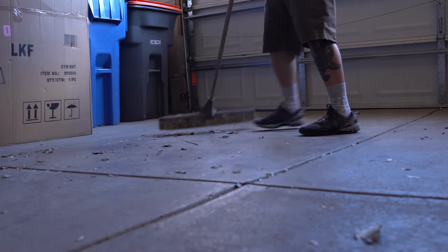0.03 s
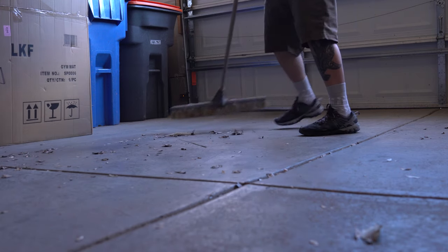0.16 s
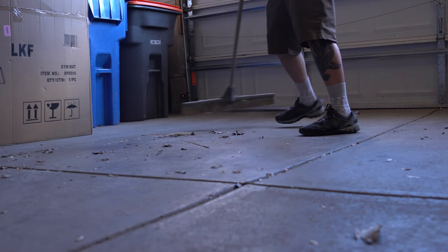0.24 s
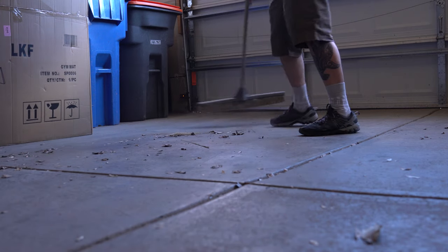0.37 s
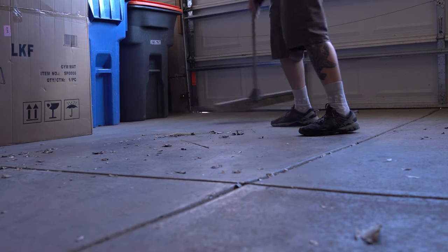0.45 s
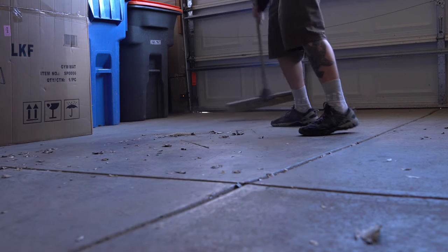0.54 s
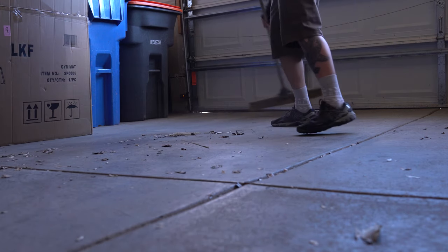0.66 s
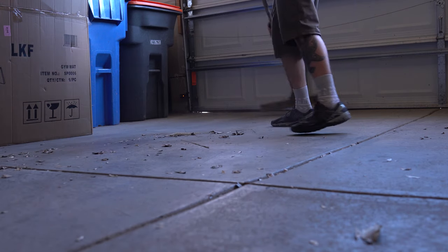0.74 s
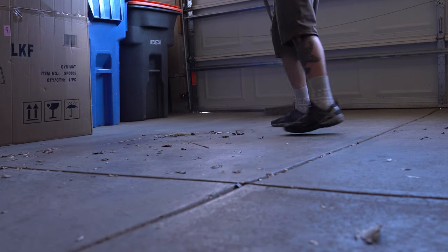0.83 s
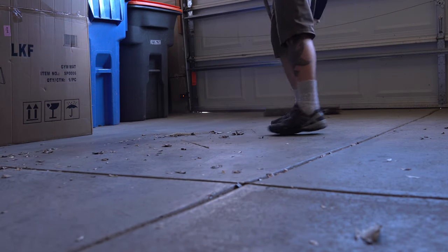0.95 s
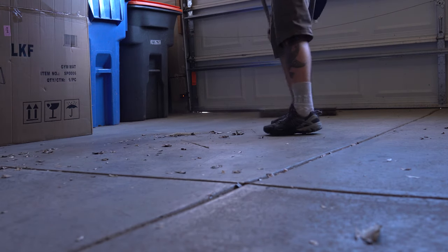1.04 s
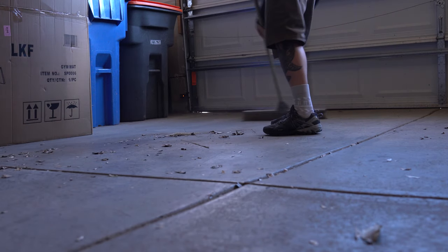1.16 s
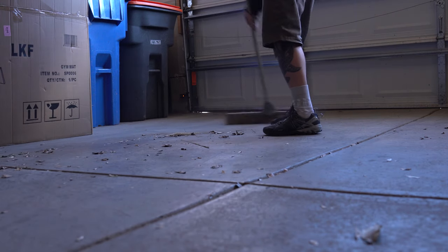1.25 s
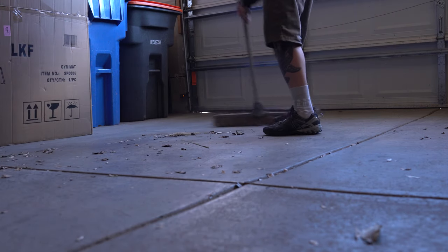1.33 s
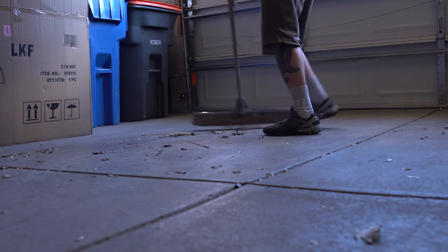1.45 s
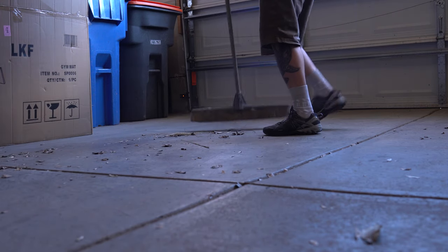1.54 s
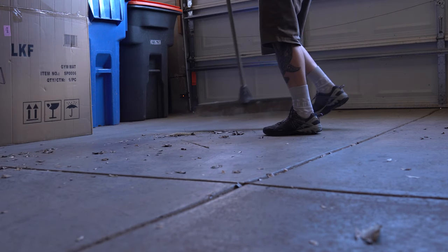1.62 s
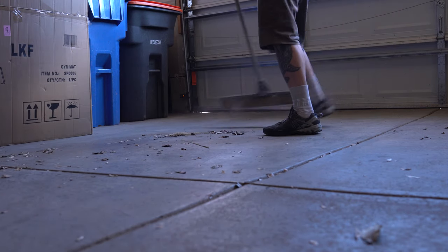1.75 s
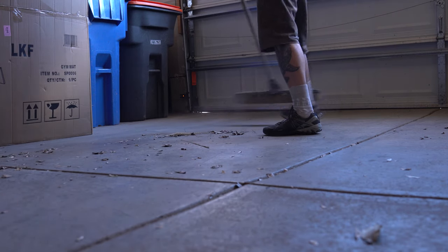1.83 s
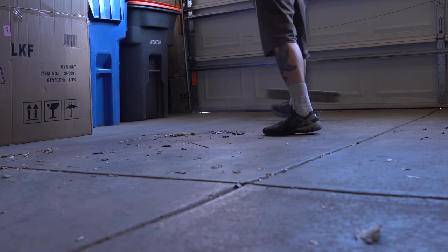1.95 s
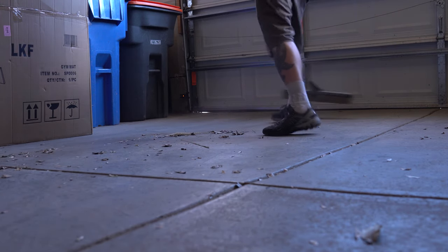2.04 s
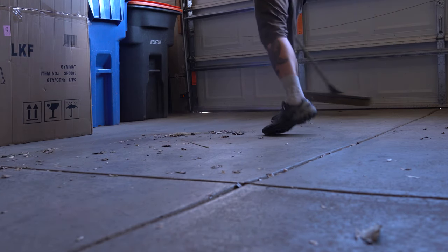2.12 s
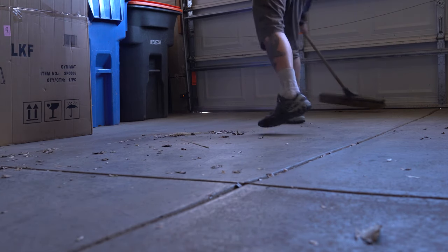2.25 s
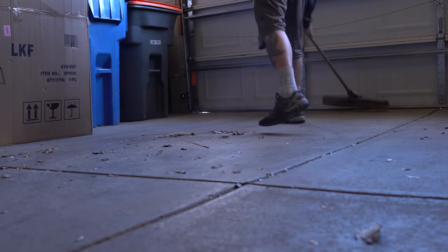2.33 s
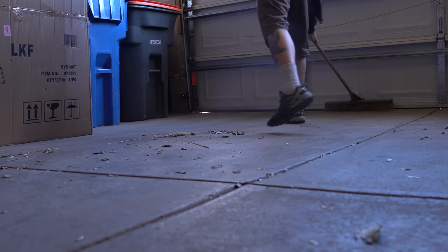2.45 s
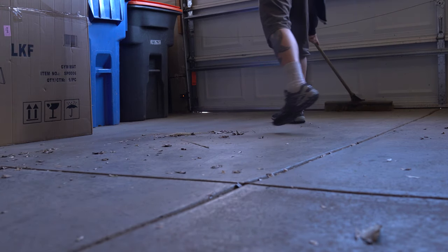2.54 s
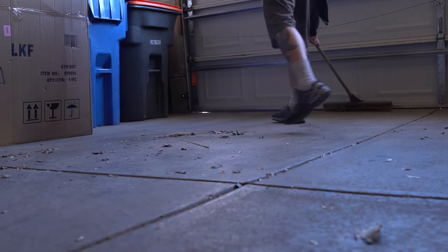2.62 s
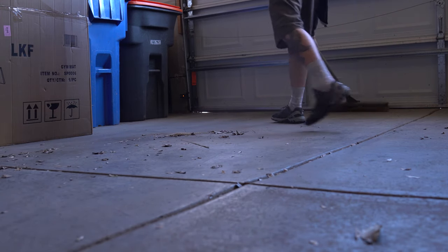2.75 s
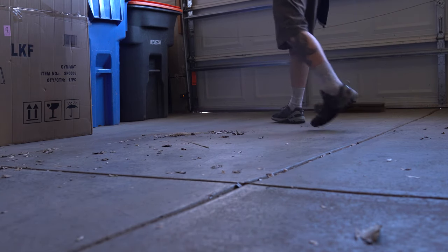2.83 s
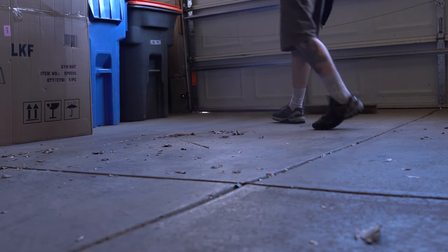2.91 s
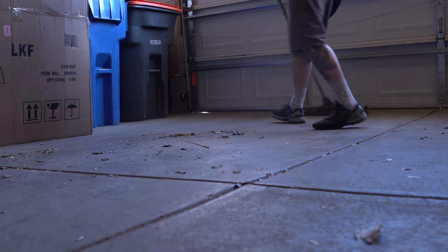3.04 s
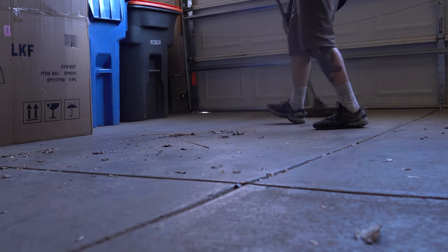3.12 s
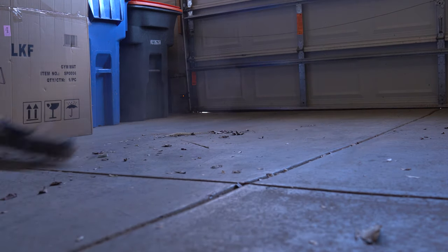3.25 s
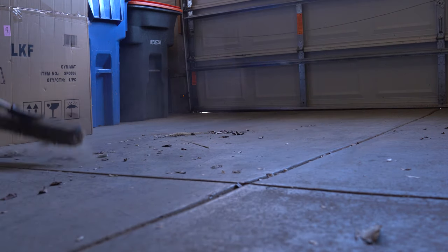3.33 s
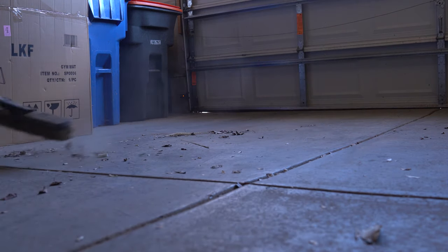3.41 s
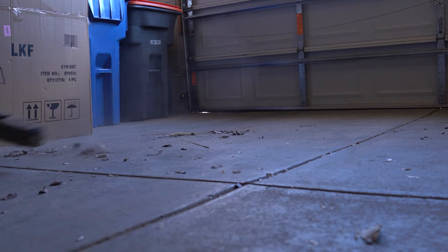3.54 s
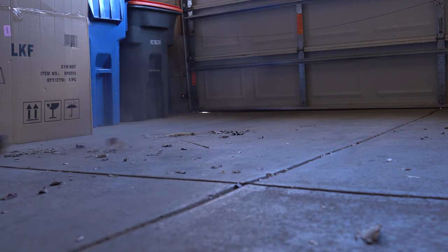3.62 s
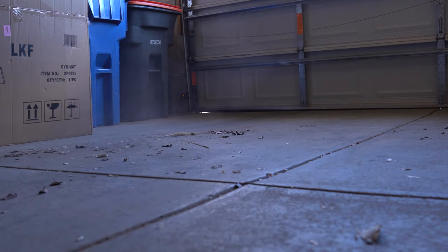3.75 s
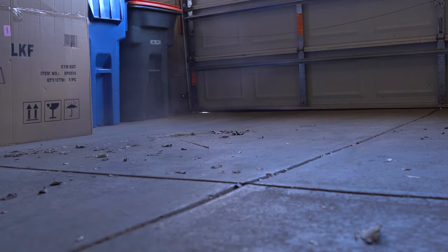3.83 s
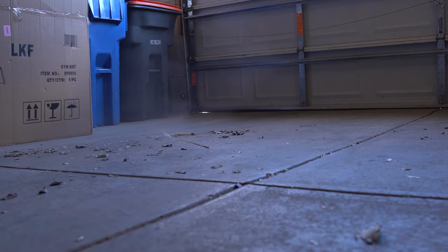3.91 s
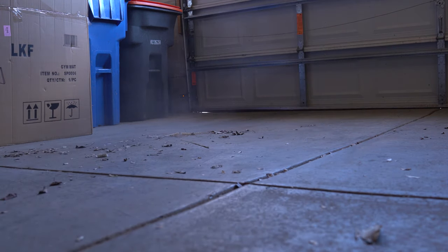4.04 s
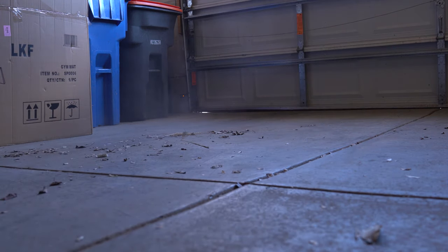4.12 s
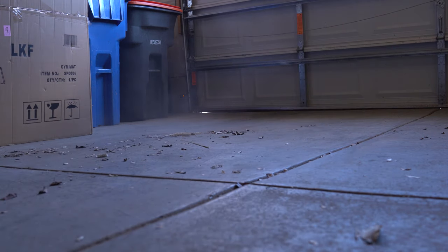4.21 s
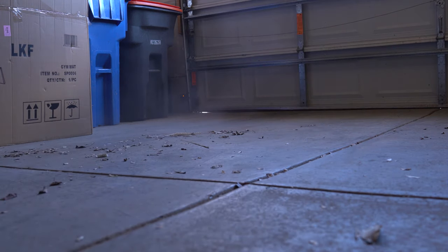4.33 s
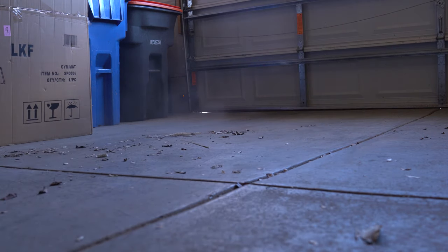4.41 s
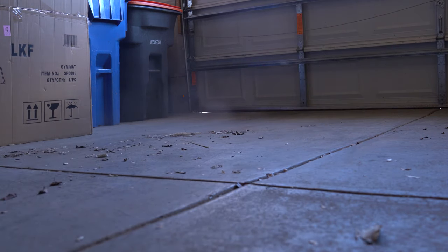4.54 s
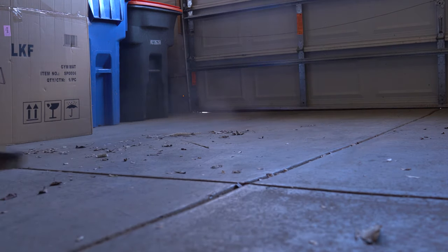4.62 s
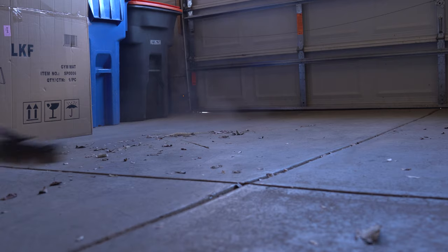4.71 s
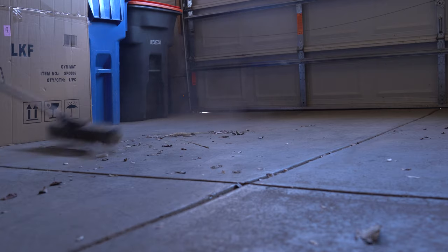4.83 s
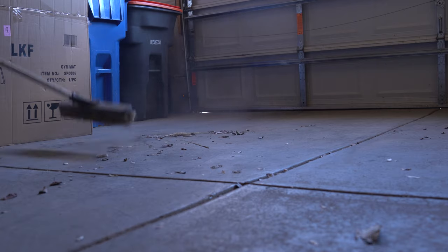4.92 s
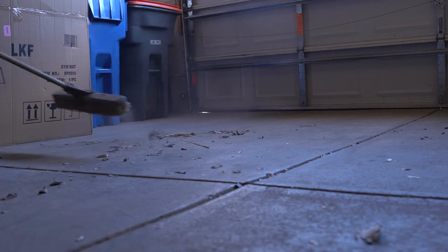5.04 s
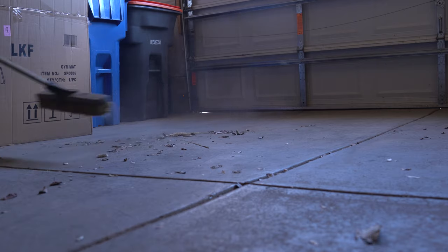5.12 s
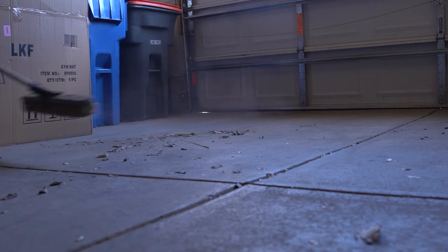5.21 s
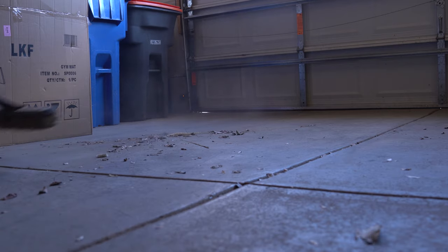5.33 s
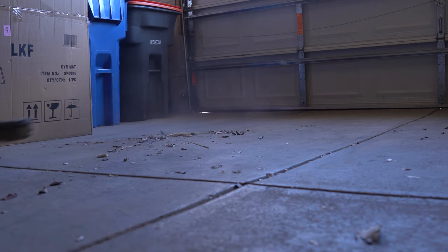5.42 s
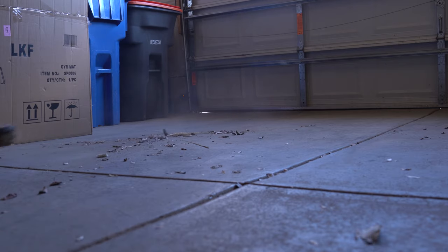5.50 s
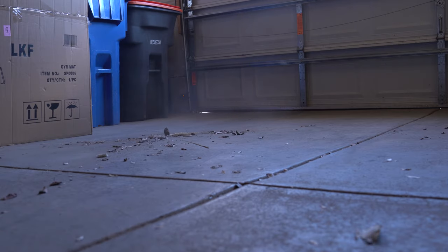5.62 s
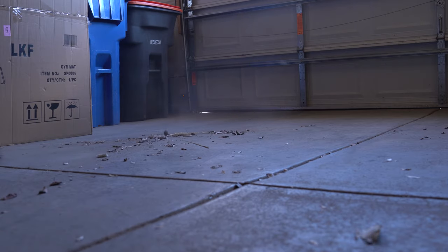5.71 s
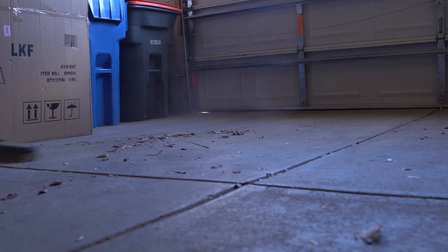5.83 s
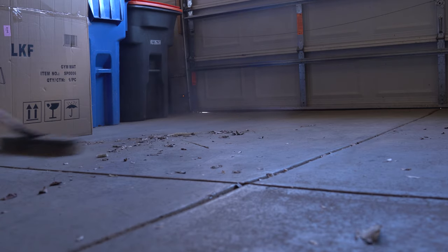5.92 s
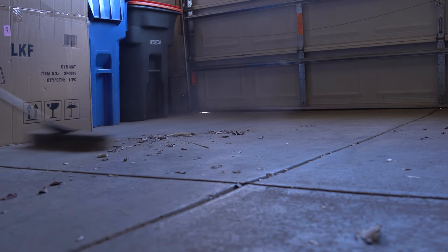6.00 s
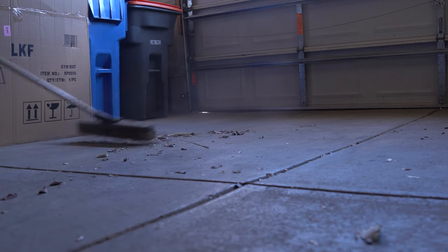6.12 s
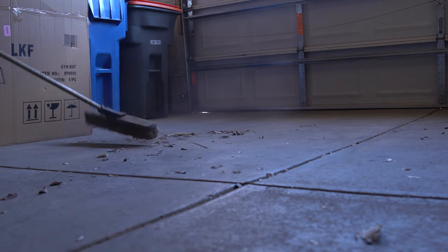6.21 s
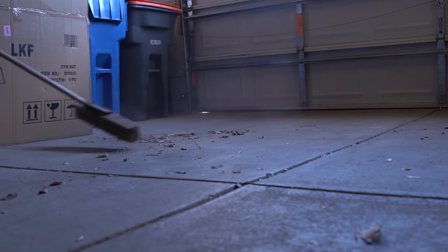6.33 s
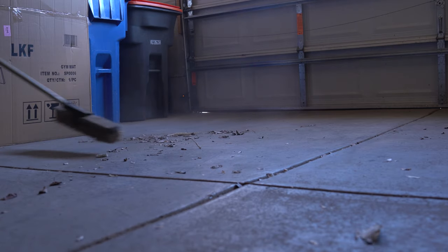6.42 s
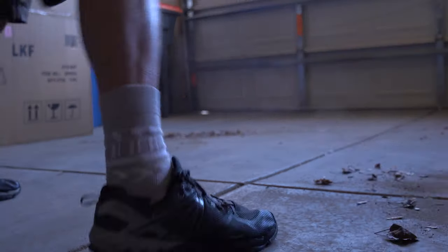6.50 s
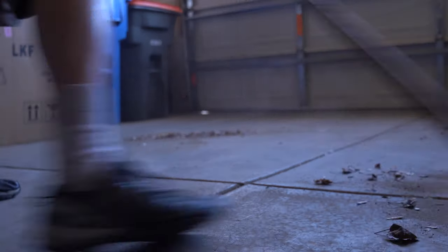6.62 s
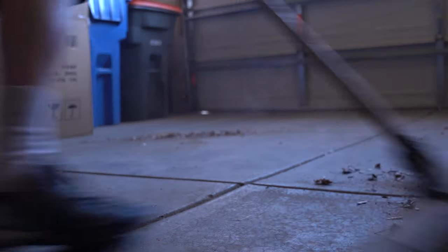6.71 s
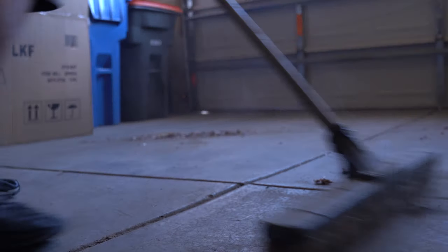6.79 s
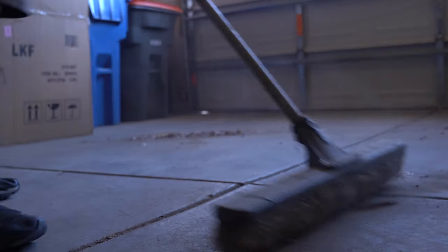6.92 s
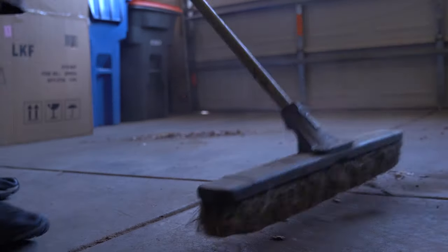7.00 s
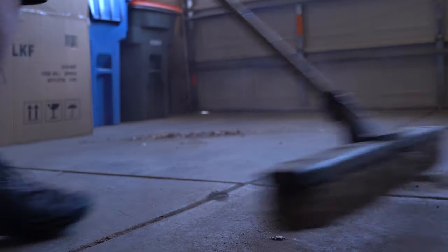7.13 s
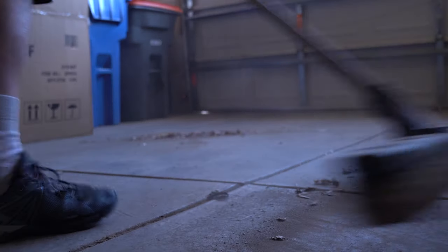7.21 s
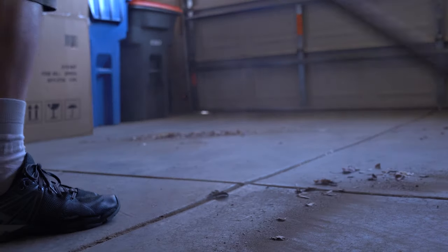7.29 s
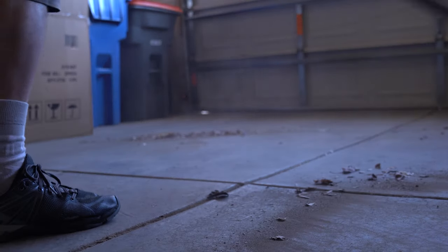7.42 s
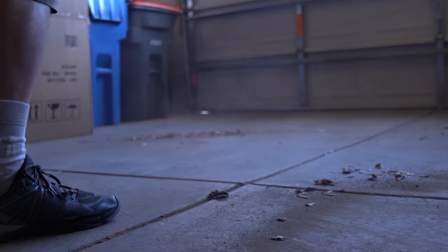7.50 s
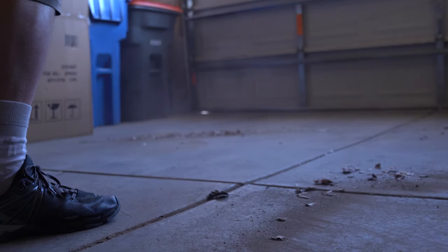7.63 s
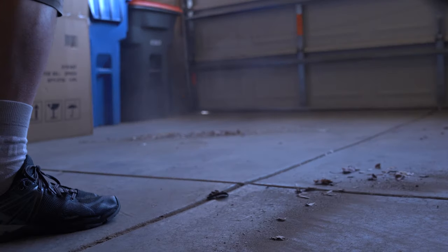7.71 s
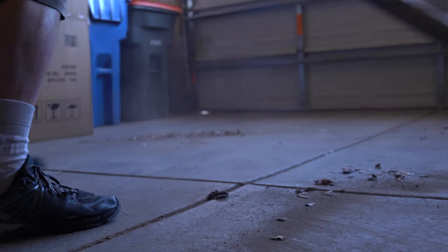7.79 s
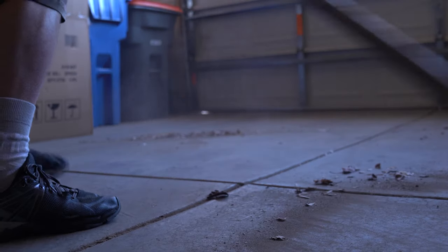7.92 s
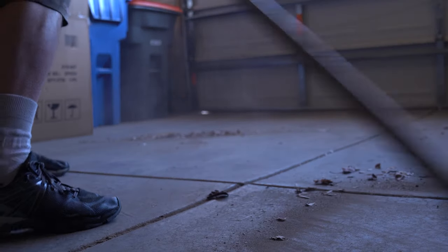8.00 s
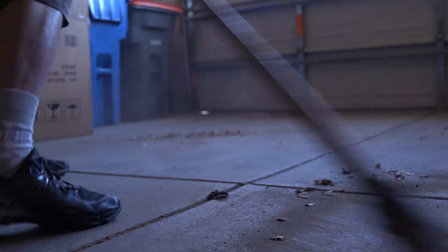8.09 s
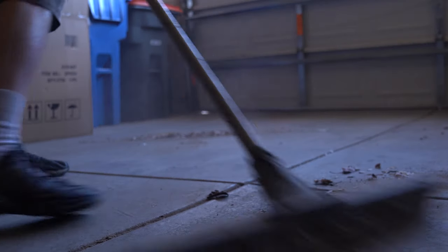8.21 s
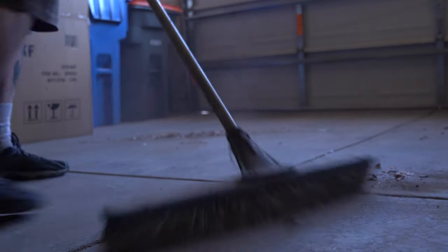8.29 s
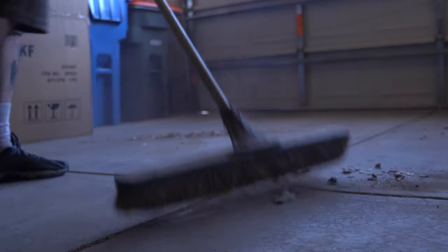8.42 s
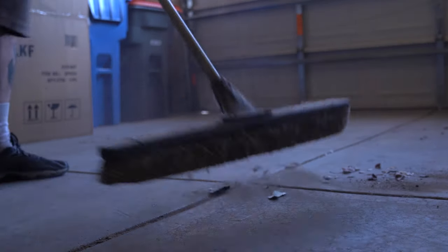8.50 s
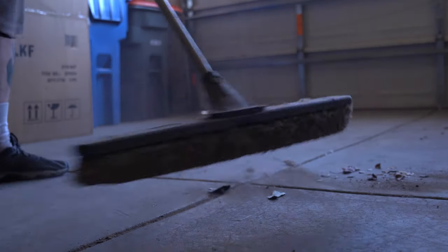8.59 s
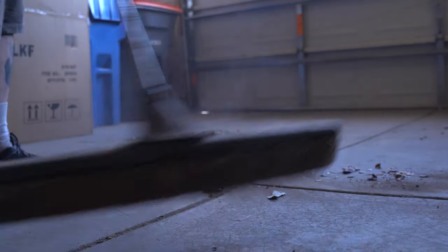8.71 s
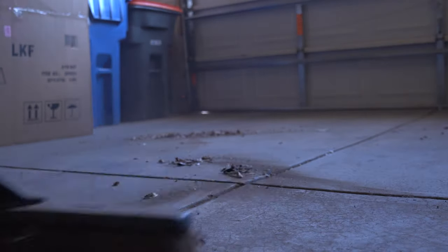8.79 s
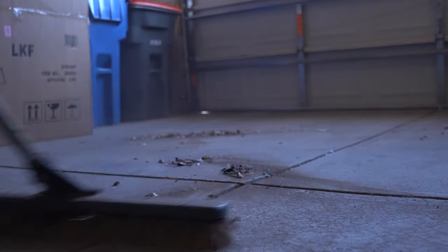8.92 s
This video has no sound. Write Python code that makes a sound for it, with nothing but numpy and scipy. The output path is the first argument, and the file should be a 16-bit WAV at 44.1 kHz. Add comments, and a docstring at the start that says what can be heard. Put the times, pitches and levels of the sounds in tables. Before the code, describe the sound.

A stiff push broom sweeps grit and dry leaves across a garage's concrete floor. Early strokes are distant and spaced out, each followed by clicking grit and occasional dull knocks and shoe scuffs. Then the head clacks once, a heavy low thump lands, and the final strokes rasp loudly close to the fixed microphone. The bare room adds a short reverberant tail over faint air and fading low rumble.

```python
"""A push broom sweeps grit and dry leaves over a garage's concrete floor: each stroke is a swarm of bristle flicks.
The first strokes are far off; loose grit skitters on after each, as separate clicks, and resonant blows make knocks.
Past five seconds the head clacks once on its handle, then a heavy thump rings the low modes of the floor.
The last strokes fall right by the microphone. The bare room's decaying noise tail follows the contacts,
and filtered noise gives steady air and a low rumble that ebbs throughout."""
import sys
import numpy as np
from scipy import signal
from scipy.fft import rfft, irfft, next_fast_len
from scipy.io import wavfile
from scipy.ndimage import uniform_filter1d

SR = 44100
rng = np.random.default_rng(int(sys.argv[2]) if len(sys.argv) > 2 else 0)


def generate_wav(sig):
    """Save sig (samples, or channels by samples) to the path in sys.argv[1] as 16-bit PCM at SR."""
    pcm = np.round(np.clip(np.atleast_2d(sig).T, -1, 1) * 32767).astype(np.int16)
    wavfile.write(sys.argv[1], SR, pcm)


N = 394694

# pushes of the broom, levels before the layer trims: start_s (touch-down), rise_s (speeding up), coast_s,
# top_db, swell_db (touch-down to top), rasp_db (coarse, re top), fizz_db (fine, re top),
# growth_db (change of fizz over the push), fade_db_per_s (as the head lifts), grit_db (loose grit set moving)
PUSHES = [(-0.3, 0.18, 0.084, -32.5, 10, -10, -6.5, 3, 79, -62),
          (0.915, 0.38, .13, -31, 16, -14, -4.5, -1.5, 75, -53),
          (2.63, 0.41, 0.26, -35, 24, -14.5, -5, -2, 90, -76),
          (3.231, 0.018, 0.035, -29.5, 3, -11.5, -4, -7, 129, -50),
          (3.613, 0.023, 0.039, -48, 1, -7.5, -9, 7, 35, -53.5),
          (4.22, 0.14, 0.26, -37.5, 15, -9.5, -3, 4, 70, -66),
          (4.51, 0.22, 0.11, -29.5, 15.5, -11, -3.5, -2, 159, -46.5),
          (5.702, 0.36, .08, -30, 13, -12, -3, 0, 134, -51.5),
          (6.529, 0.16, 0.085, -21, 3.5, -15, -7, -1, 97, -70),
          (6.70, .07, 0.099, -29, 18, -10.5, -0.5, -1, 167, -52.5),
          (7.69, 0.43, 0.069, -24.5, 16.5, -16, -8, -4, 66, -70),
          (8.09, 0.12, .14, -24.5, 15, -12.5, -0.5, -1, 185, -48),
          (8.85, 0.081, .1, -33, 16, -10, -2, -2, 100, -60)]
# spectrum of bristles on concrete: frequency_hz, density_db_per_hz (relative)
BRISTLE_SPECTRUM = [(150, -31.5), (330, -22), (600, -15), (950, -7.5), (1800, -7), (2500, -6), (3600, -4),
                    (4600, -1.5), (5700, 0.5), (7200, -5.5), (9000, -10.5), (11800, -12), (14000, -16.5),
                    (15700, -25)]
# spectrum of skittering grit: frequency_hz, density_db_per_hz (relative)
GRIT_SPECTRUM = [(1000, -33.5), (3000, -11), (5600, 1.5), (8000, 0), (11500, 1), (16000, -17)]
# single hard grains that strike the floor: start_s, level_db
GRAIN_STRIKES = [(1.856, -68), (3.594, -43), (3.746, -44), (3.84, -49), (3.932, -46), (4.03, -49),
                 (5.096, -43), (6.672, -35), (7.166, -49), (8.6, -47)]
# bristles slapping down and shoes scuffing: start_s, level_db, length_s (time scale), centre_hz
BROAD_SCUFFS = [(0.262, -55, .012, 12000), (0.43, -62, 0.18, 3950), (0.878, -48, 0.046, 2570),
                (0.917, -36.5, 0.019, 1760), (1.949, -59, 0.14, 1630), (2.027, -60, 0.24, 4220),
                (2.455, -45, 0.068, 2130), (2.567, -46, 0.035, 1800), (3.232, -38, 0.054, 4200),
                (3.611, -37, 0.0062, 3100), (4.134, -45, 0.026, 2450), (4.217, -43, 0.015, 2340),
                (5.573, -51, 0.023, 1250), (5.633, -55.5, 0.017, 4870), (5.697, -34.5, 0.015, 2560),
                (5.798, -33.5, 0.037, 3470), (6.935, -29, 0.0035, 5460), (7.078, -37, 0.0083, 4670),
                (7.177, -44, 0.0031, 2900), (7.255, -41, 0.022, 3850), (7.502, -58.5, 0.089, 1800),
                (7.627, -39, 0.044, 3330), (7.689, -32.5, 0.01, 2070), (8.506, -39, 0.0079, 6500),
                (8.624, -46.5, 0.015, 1240), (8.836, -25.5, 0.0065, 2630)]
# a stone or dry leaf dragged along, singing at one pitch: start_s, level_db, length_s (time scale), centre_hz
DRAGGED_DEBRIS = [(1.56, -45.5, 0.083, 6300), (3.77, -50.5, .07, 5200), (4.661, -39, 0.088, 2460),
                  (6.598, -28, 0.12, 2490), (7.06, -41.5, 0.058, 6000), (8.037, -25, .08, 5000)]
# dull knocks of the broom head and of shoes: start_s, level_db, centre_hz, upper_edge_hz
DULL_KNOCKS = [(0.414, -41.5, 494, 1800), (.918, -41.5, 300, 1200), (2.01, -36.5, 238, 1750),
               (2.107, -39, 281, 1740), (2.954, -40.5, 430, 1520), (3.036, -42.5, 500, 1000),
               (3.764, -41.5, 450, 850), (4.602, -44, 250, 900), (4.69, -43.5, 238, 900),
               (6.724, -37, 220, 900), (6.766, -30.5, 250, 1700), (6.899, -38, 1390, 1720),
               (6.908, -32, 1380, 1670), (6.936, -39, 1400, 1870), (7.004, -37, 990, 1150),
               (7.095, -44.5, 600, 1485), (7.25, -33, 702, 3000), (7.272, -36, 1400, 2400),
               (7.303, -40, 300, 1300), (7.975, -39, 230, 750), (8.527, -36.5, 760, 1260),
               (8.835, -31, 1410, 2150)]
# distance from sweeper to microphone: time_s, distance_m
SWEEPER_DISTANCE = [(0, 3.9), (3, 2.7), (6.2, 2.8), (7, 1.07), (8.9, 1.4)]
# spectrum of the one hard clack of the head: frequency_hz, density_db_per_hz (relative)
CLACK_SPECTRUM = [(60, -8), (120, -12), (230, -2), (350, -4.5), (540, 0), (720, -6), (950, 0.5),
                  (1500, -9.5), (2300, -9), (3200, -16.5), (6200, -14.5), (9000, -30), (15000, -43)]
# modes of head and handle: frequency_hz, level_db (relative), t60_s
WOOD_MODES = [(450, 10, 0.21), (594, 10, 0.2), (810, -15, .2), (900, -2, .22), (956, -20, 0.18),
              (1095, 10, 0.21), (2260, -16, .2)]
# landings and footfalls, levels before the low cut: start_s, level_db, hardness_hz
FLOOR_BLOWS = [(4.232, -41, 69), (5.698, -19.5, 450), (5.729, -31, 260), (5.777, -34, 340),
               (7.699, -41, 46), (7.979, -37, 200), (8.838, -23.5, 23), (8.858, -27, 40), (8.897, -36, 55)]
# low modes that the blows ring: frequency_hz, level_db (relative), t60_s
FLOOR_MODES = [(33, -5, .35), (55.5, 2, 0.21), (68, -27.5, 0.062), (86.6, -1.5, 0.12), (116, -1, 0.074),
               (169, -8, 0.11), (203, -9.5, 0.074)]
# decay of the bare room: frequency_hz, t60_s
ROOM_DECAY = [(100, 0.35), (500, 0.67), (1400, 0.62), (4000, 0.71), (10000, 0.36), (16000, 0.19)]
# spectrum of the steady air: frequency_hz, density_db_per_hz (relative)
AIR_SPECTRUM = [(25, -3), (60, -0.5), (115, 1), (170, -9), (300, -14), (600, -17), (1200, -22.5),
                (2500, -27.5), (5500, -27.5), (8000, -38.5), (13000, -36.5), (15800, -40)]
# spectrum of the low rumble: frequency_hz, density_db_per_hz (relative)
RUMBLE_SPECTRUM = [(10, -15.5), (22, 0.5), (30, 2.5), (40, -17), (70, -14.5), (150, -21.5), (280, -25.5),
                   (450, -44), (1000, -70)]
# strength of the rumble, which ebbs away: time_s, level_db
RUMBLE_EBB = [(0, -42.5), (.45, -49.5), (1.0, -48), (2, -54), (3.2, -54), (4.2, -60.5), (8.9, -58.5)]

SWELL_POWER = 1.62  # the push gains speed fast at first and levels off
COAST_SAG_DB = 2.65  # lost while the head coasts to the end of its reach
RASP_FOLLOW = 0.38  # rasp comes from pressure, so it follows the speed only in part
FLIGHT_S = 0.13  # grit thrown ahead of the broom flies before it lands
SETTLE_S, SETTLE_POWER = 0.3, 1.33  # time to fade by 10 dB; how abruptly the grit stops
SAND_DB = -3  # fine sand re grit, before the layer trims
SAND_RASP_DB, SAND_FIZZ_DB = -7.5, -5  # the sand's low and high parts re its middle, before the layer trims
TICK_S, TICK_HZ, TICK_SHARPNESS = 0.0027, 7500, 0.44
SCUFF_SHARPNESS, SCRAPE_SHARPNESS = 0.72, 6.2
ROOM_RADIUS_M = 3.2  # at this distance the room is as loud as the direct sound
AIR_DB = -53.5
EDGE_HZ = 15850  # the recorder's upper band edge

TIME = np.arange(0, N / SR, 0.001)  # control times, s
BINS = np.fft.rfftfreq(8192, 1 / SR)  # filter frequencies, Hz
RING = np.arange(SR * 3 // 4) / SR  # time within one short sound, s


def sweeping():
    """Stick-slip: thousands of bristles catch and flick free; pressure adds rasp, speed adds fizz."""
    power = sum(push(*row) for row in PUSHES)
    swish, rasp, fizz = map(per_sample, np.sqrt(power))
    low = below(2600, order=8)
    high = 1 - below(8360, order=12)
    layers = [(rasp * gain_of(-1.07), low),
              (swish * gain_of(-1.0), (1 - low) * (1 - high)),
              (fizz * gain_of(-1.5), high)]
    out = np.zeros(N)
    for level, share in layers:
        flicks = grains(N, per_s=14000, spread_db=1.0)
        band_db = read(BRISTLE_SPECTRUM, BINS) + 10 * np.log10(share + 1e-12)
        out += level * evened(colour(flicks, band_db))
    # tufts chatter together over the uneven floor
    chatter = gain_of(0.1 * waver(rate_hz=130) + 0.54 * waver(rate_hz=25))
    return garage(out * chatter, wet_db=-17.0)


def push(start, rise_s, coast_s, top_db, swell_db, rasp_db, fizz_db, growth_db, fade_db_per_s, grit_db):
    """Friction power follows speed and pressure: the head lands, speeds up, coasts, lifts; fine sand slides on."""
    t = TIME - start
    reach_s = rise_s + coast_s
    swell = swell_db * np.clip(1 - t / rise_s, 0, 1) ** SWELL_POWER
    sag = COAST_SAG_DB * np.clip((t - rise_s) / coast_s, 0, 1) ** 2
    speed_db = -swell - sag
    contact = (t >= 0) * gain_of(top_db - fade_db_per_s * np.maximum(t - reach_s, 0))
    # the fizz grows or wanes as the bristles roll onto their tips; 0 dB falls at 3/4 of the reach
    tips_db = growth_db * (np.clip(t / reach_s, 0, 1) - 0.75)
    bands_db = [speed_db, rasp_db + RASP_FOLLOW * speed_db, fizz_db + tips_db + speed_db]
    bristles = contact * gain_of(bands_db)
    sand = settling(start + reach_s, grit_db + SAND_DB) * gain_of([[0], [SAND_RASP_DB], [SAND_FIZZ_DB]])
    return bristles ** 2 + sand ** 2


def settling(lift_s, grit_db):
    """Frictional loss: grit lands after the head lifts and slowly comes to rest."""
    t = np.maximum(TIME - lift_s, 0)
    landing = np.minimum(t / FLIGHT_S, 1)
    lost_db = 10 * (np.maximum(t - FLIGHT_S, 0) / SETTLE_S) ** SETTLE_POWER
    return landing * gain_of(grit_db - lost_db)


def skittering():
    """Random impacts: separate grains bounce on after each push; a few hard ones tick out clearly."""
    level = sum(settling(start + rise_s + coast_s, grit_db)
                for start, rise_s, coast_s, *_, grit_db in PUSHES)
    bounces = gain_of(-3.0) * per_sample(level) * grains(N, per_s=530, spread_db=2.0)
    out = garage(colour(bounces, read(GRIT_SPECTRUM, BINS)), wet_db=-4.0)
    for s, db in GRAIN_STRIKES:
        add(out, s, rub(db, TICK_S, TICK_HZ, TICK_SHARPNESS))
    return out


def scuffs():
    """Friction through resonance: broad for bristles and shoes, narrower for dragged debris."""
    out = np.zeros(N)
    for rows, sharpness in (BROAD_SCUFFS, SCUFF_SHARPNESS), (DRAGGED_DEBRIS, SCRAPE_SHARPNESS):
        for s, db, length, hz in rows:
            add(out, s, rub(db, length, hz, sharpness))
    return out


def rub(db, length, hz, sharpness):
    """Filtered impulse train: a bunch of grains swells quickly and dies, through one resonance."""
    u = RING / length
    burst = grains(len(RING), per_s=16000, spread_db=3.5) * np.sqrt(u) * np.exp(-1.6 * u)
    band = (1 - below(250, order=4)) * below(12000, order=12)
    shape_db = hump(hz, sharpness) + 10 * np.log10(band + 1e-12)
    return gain_of(db) * topped(garage(colour(burst, shape_db), wet_db=-7))


def knocks():
    """Impact in a reverberant field: dull blows, wetter the farther off they fall, and one hard clack."""
    out = np.zeros(N)
    for s, db, hz, edge_hz in DULL_KNOCKS:
        distance_m = np.interp(s, *np.transpose(SWEEPER_DISTANCE))
        room_db = 20 * np.log10(distance_m / ROOM_RADIUS_M)
        shape_db = hump(hz, sharpness=0.77) + 10 * np.log10(below(edge_hz, order=7))
        knock = blow(rattle_db=2.0, rattle_s=0.0077, wood_db=-78, room_db=room_db)
        add(out, s, gain_of(db) * topped(colour(knock, shape_db)))
    clack = blow(rattle_db=10.0, rattle_s=0.029, wood_db=-56.5, room_db=-6.5)
    add(out, 5.301, gain_of(-22.5) * topped(colour(clack, read(CLACK_SPECTRUM, BINS))))
    return out


def blow(rattle_db, rattle_s, wood_db, room_db):
    """Impulse excitation: a click and the loose head's brief rattle in the room, plus the ring of the wood."""
    rattle = rng.standard_normal(len(RING)) * np.exp(-RING / rattle_s)
    click = RING == 0
    contact = click + gain_of(rattle_db) * rattle / np.linalg.norm(rattle)
    return flattened(garage(contact, room_db)) + gain_of(wood_db) * ring(WOOD_MODES, hardness_hz=3000)


def thumps():
    """Modal response: the weight of the broom or of a foot comes down and booms through the floor."""
    out = np.zeros(N)
    for s, db, hardness_hz in FLOOR_BLOWS:
        boom = garage(ring(FLOOR_MODES, hardness_hz), wet_db=-1.5)
        add(out, s, gain_of(db) * topped(boom))
    # the booms are cut away below about 39 Hz
    return colour(out, 10 * np.log10(1 - below(39, order=4)))


def ring(modes, hardness_hz):
    """Modal superposition: damped sines after a blow; a soft blow leaves the high ones quiet."""
    out = np.zeros(len(RING))
    for hz, db, t60 in modes:
        decay = gain_of(db - 60 * RING / t60)
        out += decay * np.sin(2 * np.pi * hz * RING) / np.hypot(1, hz / hardness_hz)
    return out


def garage(x, wet_db):
    """Reverberation: direct sound plus a dense tail off bare walls, each band dying at its own speed."""
    hz, t, z = signal.stft(rng.standard_normal(len(RING)), SR, nperseg=256)
    decay = gain_of(-60 * t / read(ROOM_DECAY, hz)[:, None])
    tail = signal.istft(z * decay, SR, nperseg=256)[1][:len(RING)]
    tail *= 1 - np.exp(-(RING / 0.0046) ** 2)  # the tail builds up over some milliseconds
    return x + gain_of(wet_db) * signal.oaconvolve(x, tail / np.linalg.norm(tail))[:len(x)]


def background():
    """Stationary noise: steady room air over a low rumble whose level ebbs."""
    air = evened(colour(rng.standard_normal(N), read(AIR_SPECTRUM, BINS)))
    rumble = evened(colour(rng.standard_normal(N), read(RUMBLE_SPECTRUM, BINS)))
    level_db = np.interp(np.arange(N) / SR, *np.transpose(RUMBLE_EBB))
    return gain_of(AIR_DB) * air + gain_of(level_db) * rumble


def grains(length, per_s, spread_db):
    """Shot noise of rms 1: random clicks, most small and a few large."""
    size = gain_of(spread_db * np.minimum(rng.exponential(1, length), 3.5))
    sign = rng.choice([-1., 1.], length)
    return evened(size * sign * (rng.random(length) < per_s / SR))


def waver(rate_hz):
    """Low-passed noise: a slow random fluctuation of rms 1."""
    size = next_fast_len(N, True)
    rolloff = np.exp(-np.fft.rfftfreq(size, 1 / SR) / rate_hz)
    return evened(irfft(rfft(rng.standard_normal(size)) * rolloff, size)[:N])


def colour(x, curve_db):
    """Minimum-phase filtering: a causal filter whose gain over BINS is curve_db, floored 100 dB below its top."""
    log_gain = np.log(gain_of(np.maximum(curve_db, curve_db.max() - 100)))
    circle = np.concatenate([log_gain, log_gain[-2:0:-1]])
    taps = np.fft.ifft(np.exp(np.conj(signal.hilbert(circle)))).real[:len(BINS)]
    return signal.oaconvolve(x, taps)[:len(x)]


def flattened(x):
    """Spectral whitening: evens out a burst's broad colour, keeping its timing and fine grain."""
    power = uniform_filter1d(abs(rfft(x[:2 * len(BINS) - 2])) ** 2, size=25)
    return colour(x, -10 * np.log10(np.maximum(power, 1e-12)))


def hump(hz, sharpness):
    """Resonance: the response of one damped mode over BINS, in dB."""
    ratio = (BINS + 1) / hz
    return -10 * np.log10(1 + (sharpness * (ratio - 1 / ratio)) ** 2)


def below(hz, order):
    """Low-pass law: share of power that lies under a soft edge, over BINS."""
    return 1 / (1 + ((BINS + 1) / hz) ** order)


def read(points, hz):
    """Interpolation of a table on a log-frequency axis."""
    f, value = np.transpose(points)
    return np.interp(np.log(hz + 1), np.log(f + 1), value)


def per_sample(control):
    """Interpolation of a control given over TIME to all samples."""
    return np.interp(np.arange(N) / SR, TIME, control)


def gain_of(db):
    """Decibel law: level to amplitude."""
    return np.exp(np.asarray(db) * (np.log(10) / 20))


def evened(x):
    """Power normalization: scales to rms 1."""
    return x / np.sqrt(np.mean(x ** 2) + 1e-20)


def topped(x):
    """Short-time normalization: scales so that the loudest 5 ms have rms 1."""
    return x / np.sqrt(uniform_filter1d(x ** 2, size=220).max() + 1e-20)


def add(mix, s, sound):
    """Superposition: mixes a sound in at time s, in seconds."""
    part = mix[max(round(s * SR), 0):][:len(sound)]
    part += sound[:len(part)]


def scene():
    """Superposition: all sources sum at one microphone, given alike to both channels."""
    mono = sweeping() + skittering() + scuffs() + knocks() + thumps() + background()
    return np.array([mono, mono])


def record(dry):
    """Band limiting: a linear-phase low-pass stands for the recorder's upper edge."""
    taps = signal.firwin(511, EDGE_HZ, window=("kaiser", 9), fs=SR)
    return signal.oaconvolve(dry, taps[None], "same", axes=1)


dry = scene()
out = record(dry)
generate_wav(out)
```